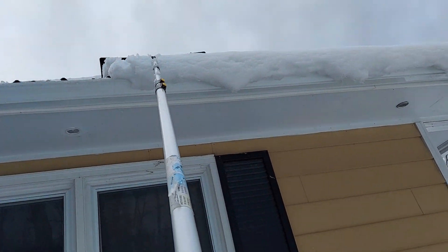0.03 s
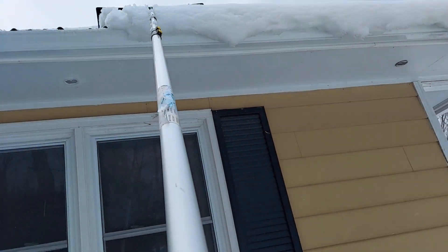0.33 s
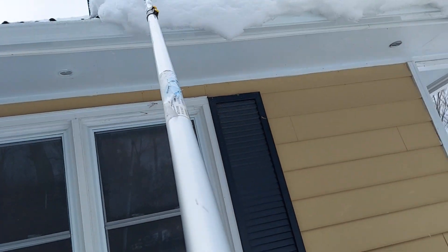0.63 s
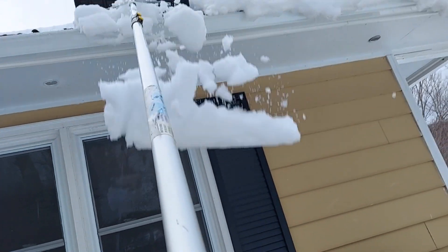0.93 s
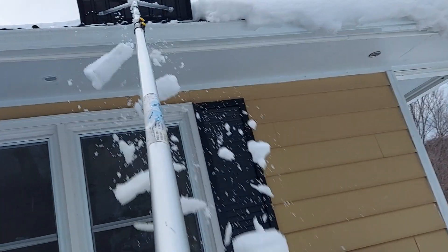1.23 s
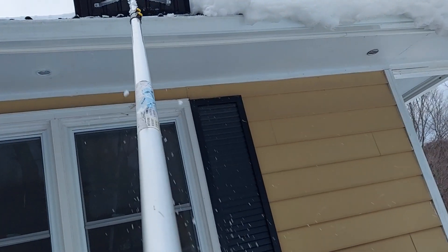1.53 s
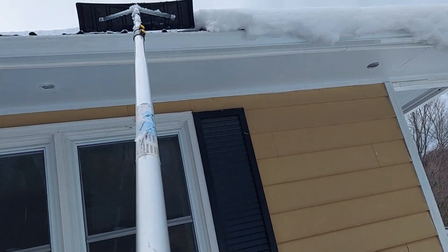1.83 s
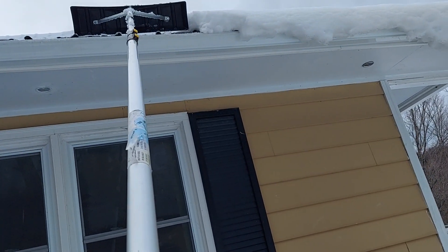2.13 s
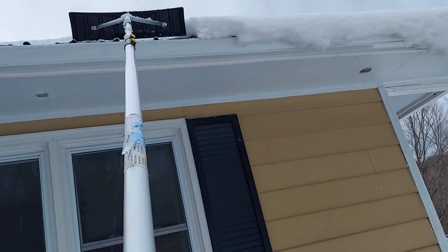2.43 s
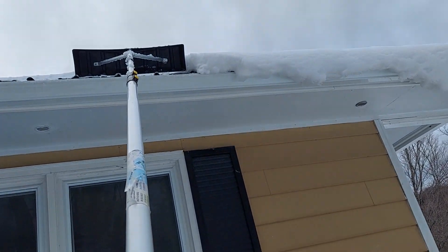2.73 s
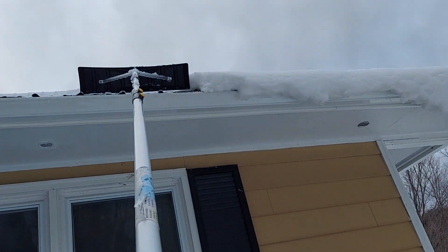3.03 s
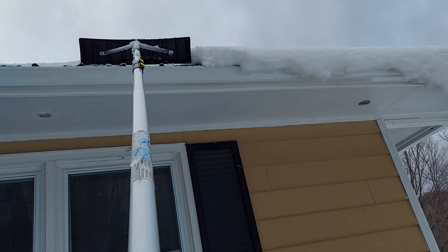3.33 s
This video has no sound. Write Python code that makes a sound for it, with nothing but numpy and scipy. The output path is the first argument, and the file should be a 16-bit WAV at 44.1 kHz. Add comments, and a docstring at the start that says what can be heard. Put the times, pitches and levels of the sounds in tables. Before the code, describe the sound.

Snow is raked from a roof outdoors, crunching as the blade catches and creaks, then landing in a quick run of dull thuds. Wind buffets the microphone throughout, and a few specks of snow pop against it near the end.

```python
"""Wind buffets two microphone ports throughout; a sleeve rustles and ice ticks faintly on a pole.
From 0.5 s a long roof rake drags a slab of snow over the eave: the plastic blade catches and
creaks, the snow crunches, crumbles and slides off. From 1.4 s the chunks thud and splash on the
ground and crumbs patter after them. From 2.7 s specks of snow pop on the right port."""
import sys
import numpy as np
from scipy import signal
from scipy.fft import rfft, irfft
from scipy.io import wavfile
from scipy.ndimage import uniform_filter1d

SR = 44100
rng = np.random.default_rng(int(sys.argv[2]) if len(sys.argv) > 2 else 0)


def store_pcm(level_fs):
    """Save levels as 16-bit WAV."""
    pcm = np.round(np.clip(level_fs, -1, 1) * 32767).astype(np.int16)
    wavfile.write(sys.argv[1], SR, np.atleast_2d(pcm).T)


N = 158760
T = np.arange(N) / SR
HZ = np.fft.rfftfreq(N, 1 / SR)


def amp(db):
    """Decibels to gain."""
    return 10 ** (np.asarray(db) / 20)


def unit_rms(x):
    """Scales to rms 1."""
    return x / np.sqrt(np.mean(x ** 2) + 1e-20)


def steadied(x):
    """Holds a stereo texture near rms 1 from moment to moment."""
    x = unit_rms(x)
    return x / np.sqrt(uniform_filter1d((x ** 2).mean(0), size=800) + 1e-6)


def log_interp(points, hz):
    """Interpolates on a log-frequency axis."""
    f, value = np.transpose(points)
    return np.interp(np.log(np.maximum(hz, f[0])), np.log(f), value)


def level(points):
    """Gain over time from (s, dB) points, silent outside them."""
    s, db = np.transpose(points)
    return amp(np.interp(T, s, db, left=-140, right=-140))


def burst(start_s, rise_s, decay_s):
    """Envelope: linear rise, exponential decay."""
    t = T - start_s
    return np.clip(t / rise_s, 0, 1) * np.exp(-np.maximum(t - rise_s, 0) / decay_s)


def pan(left_over_right_db):
    """Stereo gains of constant power."""
    return unit_rms(amp([[left_over_right_db / 2], [-left_over_right_db / 2]]))


def colour(x, spectrum):
    """Filters by (Hz, dB) points, then scales to rms 1."""
    return unit_rms(irfft(rfft(x) * amp(log_interp(spectrum, HZ)), N))


def drift():
    """Random wander at rms 1, smoothed over 1/30 s."""
    return unit_rms(signal.oaconvolve(rng.standard_normal(N), np.hanning(SR // 30), "same"))


def resonate(x, hz, width_hz):
    """Unity-gain resonance with a moving centre."""
    carrier = np.exp(2j * np.pi * np.cumsum(hz) / SR)
    radius = np.exp(-np.pi * width_hz / SR)
    return 2 * (carrier * signal.lfilter([1 - radius], [1, -radius], x / carrier)).real


def grains(per_s, spread_db):
    """Tiny random fractures of uneven size at two ports, alike in the bass."""
    # Each row: frequency in Hz, left-right correlation.
    correlation = [(500, 0.89), (1300, 0.27), (4500, 0.041)]
    size = amp(spread_db * np.minimum(rng.exponential(1, N), 4))
    left, other = rfft(rng.standard_normal((2, N)) * size * (rng.random(N) < per_s / SR))
    alike = log_interp(correlation, HZ)
    right = alike * left + np.sqrt(1 - alike ** 2) * other
    return unit_rms(irfft([left, right], N))


def thump(centre_s, db, hz, cycles):
    """A few low pressure swings under a Gaussian envelope."""
    turns = hz * (T - centre_s)
    return amp(db) * np.exp(-(turns / cycles) ** 2) * np.sin(2 * np.pi * (turns + rng.random()))


def air():
    """Faint steady hiss."""
    # Each row: frequency in Hz, relative density in dB.
    spectrum = [(500, 16), (6600, -4.5), (8000, 6.5), (9500, -3), (15000, 3.5)]
    return amp(-71) * colour(rng.standard_normal((2, N)), spectrum)


def turbulence(levels, edge, flurry_above_hz=140, flurry_db=6):
    """Rumble at one port, scaled in pitch by its upper edge; the upper part comes in flurries."""
    # Each row: multiple of the edge frequency, relative density in dB.
    spectrum = [(.12, -43), (.36, 2), (.8, -1), (1.2, -8), (2.8, -33.5), (4.5, -50), (40, -84.5)]
    hz, t, bins = signal.stft(rng.standard_normal(N), SR, nperseg=2048, noverlap=1536)
    edge_hz = np.interp(t, *np.transpose(edge))
    bins = bins * amp(log_interp(spectrum, hz[:, None] / edge_hz))
    rumble = unit_rms(signal.istft(bins, SR, nperseg=2048, noverlap=1536)[1][:N])
    low = signal.sosfiltfilt(signal.butter(2, flurry_above_hz, fs=SR, output="sos"), rumble)
    rumble = low + (rumble - low) * unit_rms(amp(flurry_db * drift()))
    power = uniform_filter1d(uniform_filter1d(rumble ** 2, size=2000), size=2000)
    return rumble / np.sqrt(power + 1e-6) * amp(np.interp(T, *np.transpose(levels)))


def wind():
    """Separate turbulence at each port; single eddies thump the left one."""
    # Each row: time in seconds, level in dB.
    left_levels = [(0, -30.5), (.31, -34), (.6, -41.5), (.98, -31.5), (1.15, -47.5), (1.28, -34.5),
                   (1.8, -39.5), (1.98, -24), (2.13, -40.5), (2.22, -28), (2.78, -50.5), (2.86, -28.5),
                   (3.14, -32.5), (3.58, -52)]
    right_levels = [(.12, -48.5), (.32, -54), (.47, -35), (1.85, -43.5), (1.97, -50), (2.6, -37),
                    (2.645, -33), (2.78, -45), (2.92, -30.5), (3.4, -37.5), (3.56, -52)]
    # Each row: time in seconds, upper edge of the rumble in Hz.
    left_edge = [(0, 109.8)]
    right_edge = [(2.2, 118.3), (2.95, 211), (3.56, 122)]
    # Each row: centre in seconds, envelope peak in dB, frequency in Hz.
    eddies = [(0.24, -16.5, 86.4), (.308, -29, 192), (1.897, -11, 97.5), (1.92, -11.5, 123),
              (1.916, -17.5, 215), (2.028, -29.5, 172)]
    gusts = np.array([turbulence(left_levels, left_edge), turbulence(right_levels, right_edge)])
    return gusts + pan(27) / np.sqrt(2) * sum(thump(*row, cycles=0.65) for row in eddies)


def wall(x, db=-19.5, t60_s=0.2, gap_s=0.006):
    """Short scatter from the house wall and the eave."""
    t = T[:SR // 4]
    tail = rng.standard_normal((2, len(t))) * amp(-60 * t / t60_s) * (t > gap_s)
    return amp(db) * signal.oaconvolve(x, tail / np.linalg.norm(tail[0]), axes=1)[:, :N]


def specks(swing_hz=318, swing_decay_s=0.0018):
    """Snow hits the right port: each speck a pressure spike and a low swing; one brief scuff."""
    # Each row: start in seconds, spike level before filtering in dB, width in seconds.
    hits = [(2.730, -37, 0.0003), (2.8045, -27.5, 0.00012), (2.8193, -21, 0.00012), (2.9031, -24, 0.00065),
            (3.275, -26.5, 0.000071), (3.311, -27.5, 0.000067), (3.316, -14, 0.00012),
            (3.3206, -23.5, 0.0014)]
    # Each row: time in seconds, level in dB.
    scuff_levels = [(2.80, -85), (2.825, -65), (2.895, -56), (2.92, -71)]
    # Each row: frequency in Hz, gain in dB.
    port_response = [(900, 0), (2400, -0.5), (2850, -8.5), (3550, -5.5), (5600, -13.5), (7900, 2),
                     (10300, -15), (14000, -4)]
    t, pressure = T[:SR // 25], np.zeros(N)
    swing = amp(-2.5) * np.exp(-t / swing_decay_s) * np.sin(2 * np.pi * swing_hz * t)
    for start_s, db, width_s in hits:
        u = 2 * np.pi * t / width_s
        pressure[round(start_s * SR):][:len(t)] += amp(db) * (u * np.exp(1 - u) - swing)
    pops = irfft(rfft(pressure) * amp(log_interp(port_response, HZ)), N)
    scuff = level(scuff_levels) * colour(grains(12000, 5.2), port_response)
    return pan(-25.5) * (pops / np.sqrt(2) + scuff)


def sleeve():
    """Cloth rubs as the arms move."""
    # Each row: time in seconds, level in dB.
    rubs = [(.05, -72), (.26, -58.5), (.38, -68.5), (.9, -57)]
    # Each row: frequency in Hz, relative density in dB.
    cloth = [(1500, -1.5), (4400, -8.5), (5200, 1)]
    return level(rubs) * pan(4.5) * colour(grains(9900, 4.8), cloth)


def pole_ticks(decay_s=0.0072, faint_per_s=8, faint_db=-69):
    """Bits of ice tick on the pole, with fainter ticks at random."""
    # Each row: start in seconds, level in dB.
    ticks = [(.112, -58), (0.425, -57), (1.32, -52), (2.059, -47.5), (2.408, -62.5), (3.013, -62.5),
             (3.227, -63.5)]
    # Each row: frequency in Hz, relative density in dB.
    spectrum = [(500, -14), (3000, -16.5), (6500, -2.5), (8200, 11), (9800, -3)]
    faint = signal.oaconvolve(rng.random(N) < faint_per_s / SR, np.exp(-T / decay_s))[:N]
    distinct = sum(amp(db) * burst(s, 1 / SR, decay_s) for s, db in ticks)
    return (amp(faint_db) * faint + distinct) * colour(grains(25000, 3.6), spectrum)


def slap(start_s, db, hz):
    """A flat face meets the ground: a sharp push of air, a slower rebound."""
    u = 2 * np.pi * hz * np.maximum(T - start_s, 0)
    push = u * (2 - u) * np.exp(-u)
    return amp(db) * push / push.max()


def landing(thud_decay_ratio=0.53):
    """Chunks pack with a thud and burst into grains; firm ones slap; loose crumbs keep falling."""
    # Each row: start, rise and splash decay in seconds, thud and splash levels in dB.
    chunks = [(1.383, 0.027, 0.038, -29.5, -26), (1.443, 0.019, 0.017, -46, -38),
              (1.549, .022, 0.028, -36, -33.5), (1.615, 0.0032, 0.0099, -25, -25.5),
              (1.638, 0.0042, 0.015, -27, -31), (1.671, 0.0019, 0.024, -28.5, -36.5),
              (1.743, 0.017, 0.018, -34, -30), (1.812, .014, 0.014, -25.5, -29.5)]
    # Each row: start in seconds, peak in dB, frequency in Hz.
    slaps = [(1.619, -22, 325), (1.642, -25, 292), (1.6724, -27.5, 560), (1.682, -26.5, 226)]
    # Each row: time in seconds, level in dB.
    crumb_levels = [(1.375, -93), (1.39, -32), (1.52, -36.5), (1.86, -40.5), (2.06, -52), (2.12, -63.5),
                    (2.35, -78)]
    # Each row: frequency in Hz, relative density in dB.
    thud_spectrum = [(30, -12.5), (70, -5), (130, -2.5), (220, 2), (480, -13.5), (650, -12), (1000, -42),
                     (5000, -56)]
    splash_spectrum = [(600, 1), (4500, -3), (8200, 4), (9500, -10), (13000, 5.5), (15500, 1)]
    crumb_spectrum = [(1500, -11.5), (3500, -13), (5500, -4), (8300, 2.5), (9500, -10.5), (14000, 9.5)]
    packing = sum(amp(db) * burst(s, rise, decay * thud_decay_ratio) for s, rise, decay, db, _ in chunks)
    bursting = sum(amp(db) * burst(s, rise, decay) for s, rise, decay, _, db in chunks)
    thuds = packing * steadied(colour(grains(8300, 3.3), thud_spectrum))
    splashes = bursting * colour(grains(11000, 2.1), splash_spectrum)
    crumbs = level(crumb_levels) * colour(grains(13000, 2.5), crumb_spectrum)
    slab = thump(centre_s=1.416, db=-21.5, hz=119, cycles=1.57)
    blows = slab + sum(slap(*row) for row in slaps)
    return pan(2.5) * (thuds + blows) + pan(-1.5) * (splashes + crumbs)


def crumble():
    """The slab breaks up over the eave in dull, uneven lumps."""
    # Each row: time in seconds, level in dB.
    breakup = [(.82, -51), (.99, -44), (1.06, -53.5), (1.33, -54.5)]
    lumps = resonate(grains(700, 3.07), hz=348 * np.exp(0.36 * drift()), width_hz=37)
    return level(breakup) * steadied(lumps)


def flex(depth=0.028):
    """Wavering pitch factor of the flexing blade."""
    return 1 + depth * drift()


def creak(hz=552, roughness=0.5, rough_hz=500):
    """Stick-slip locks onto the blade's main mode: a rough groan that builds and lets go."""
    # Each row: start, rise and decay in seconds, envelope peak in dB.
    creaks = [(.66, .057, .009, -23), (.783, .01, .005, -23.5), (1.0, .025, .025, -37.5)]
    turns = np.cumsum(hz * flex()) / SR
    grip = 1 + roughness * unit_rms(uniform_filter1d(rng.standard_normal(N), size=SR // rough_hz))
    envelope = sum(amp(db) * burst(s, rise, decay) for s, rise, decay, db in creaks)
    return envelope * grip * np.sin(2 * np.pi * turns)


def rake(contact_s=0.00024, rasp_above_hz=2000):
    """Stick-slip and catches ring the blade; snow grinds and crunches, rasping in the upper modes."""
    # Blade force on the roof, snow crushing. Each row: time in seconds, level in dB.
    drag = [(.49, -90), (.515, -50.5), (.597, -62), (.604, -31), (.655, -34), (.715, -27.5), (.797, -34.5),
            (.822, -62), (.85, -41.5), (1.02, -50.5), (1.38, -71)]
    crush = [(.49, -72), (.52, -55), (.597, -49), (.604, -37), (.70, -30.5), (.795, -38.5), (.815, -43.5),
             (1.0, -43.5), (1.095, -48.5), (1.106, -35.5), (1.14, -44), (1.39, -56)]
    # Each row: start in seconds, strength in dB.
    catches = [(.6015, -20), (0.612, -15), (1.104, -32)]
    # Blade and pole. Each row: frequency in Hz, width in Hz, relative level in dB.
    modes = [(240, 50, -8), (562, 42, 0), (820, 100, -11), (1540, 80, -19), (2640, 240, -21),
             (6660, 130, -24)]
    # Each row: frequency in Hz, relative density in dB.
    scrape_spectrum = [(150, -20), (280, -3), (420, -7), (640, 1), (880, -3), (980, -17), (2200, -24)]
    crunch_spectrum = [(300, -5), (1000, 3.5), (3000, -7), (7500, -6), (9800, -8.5), (14000, 2)]
    t = T[:SR // 8]
    ring = sum(amp(db) * np.sqrt(width) * np.exp(-np.pi * width * t) * np.sin(2 * np.pi * hz * t)
               for hz, width, db in modes)
    ring /= abs(ring).max()
    impulses = sum(amp(db) * burst(s, contact_s, contact_s) for s, db in catches) / (contact_s * SR)
    knocks = signal.oaconvolve(impulses, ring)[:N]
    force = level(drag)
    pressure = force / force.max()
    judder = steadied(signal.oaconvolve(grains(2500, 3.0), ring[None], axes=1)[:, :N])
    judder *= amp(-3) * pressure ** 0.14  # rings more when pressed harder
    scrape = amp(-4.5) * colour(grains(5000, 2.8), scrape_spectrum)
    crunch = amp(-0.5) * pan(4) * colour(grains(14000, 1.5), crunch_spectrum)
    rasp = sum(resonate(crunch, hz * flex(), width) for hz, width, _ in modes if hz > rasp_above_hz)
    rasp *= amp(8.5) * pressure ** 0.95
    return force * (judder + scrape) + level(crush) * (crunch + rasp) + knocks


def scene():
    """Rake and falling snow by the wall; wind and handling close to the microphone."""
    snow = rake() + creak() + crumble() + landing()
    return air() + wind() + wall(snow) + pole_ticks() + sleeve() + specks() + snow


def record(dry, low_cut_hz=40, high_cut_hz=15720):
    """Low cut and band limit."""
    cut = irfft(rfft(dry) / np.sqrt(1 + (low_cut_hz / (HZ + 1)) ** 8), N)
    lowpass = signal.firwin(601, high_cut_hz, window=("kaiser", 8), fs=SR)
    return signal.oaconvolve(cut, lowpass[None], "same")


dry = scene()
out = record(dry)
store_pcm(out)
```